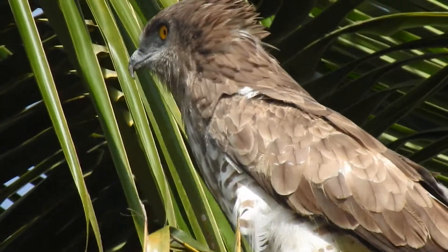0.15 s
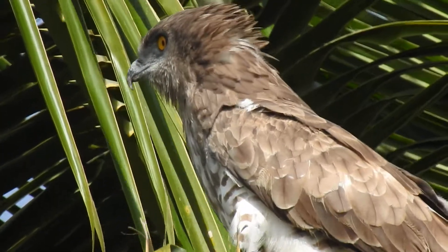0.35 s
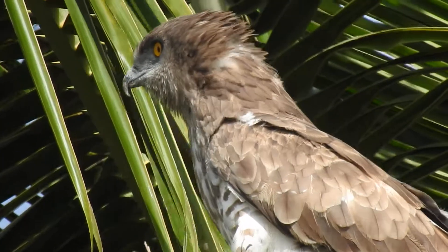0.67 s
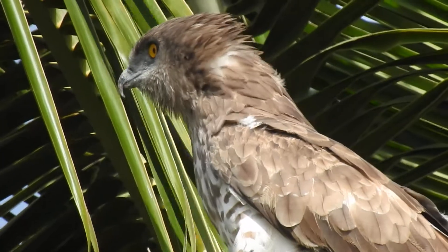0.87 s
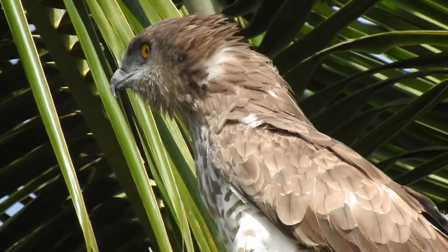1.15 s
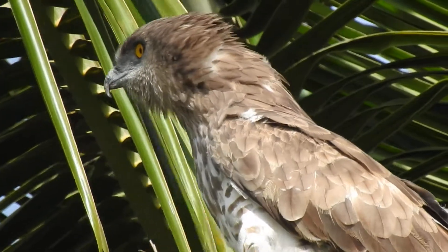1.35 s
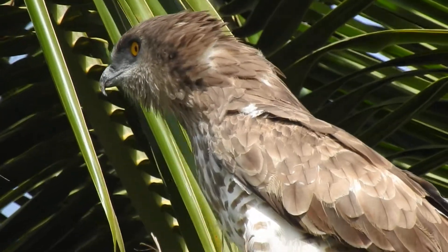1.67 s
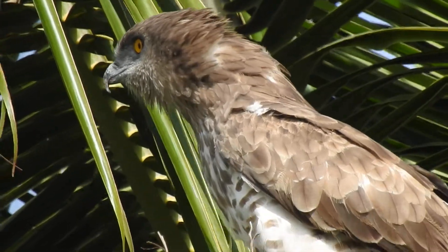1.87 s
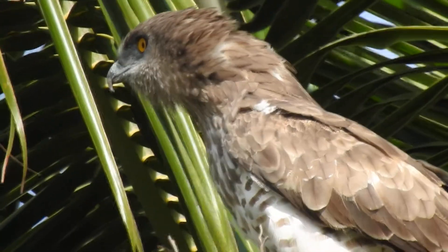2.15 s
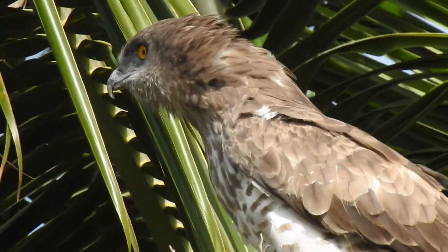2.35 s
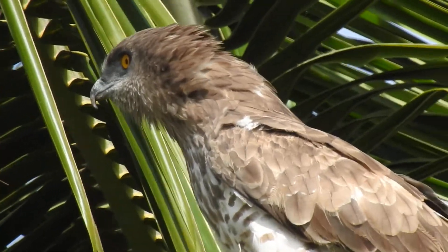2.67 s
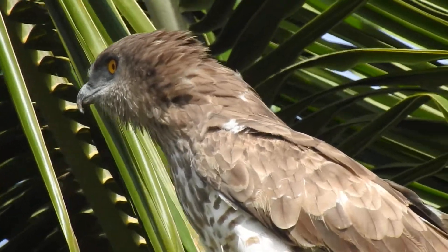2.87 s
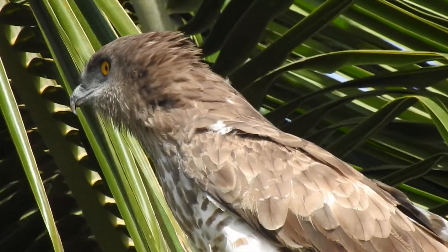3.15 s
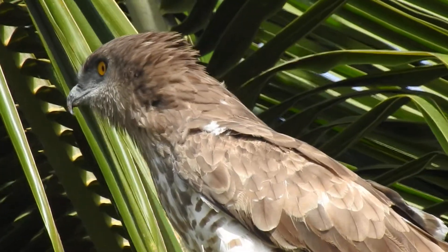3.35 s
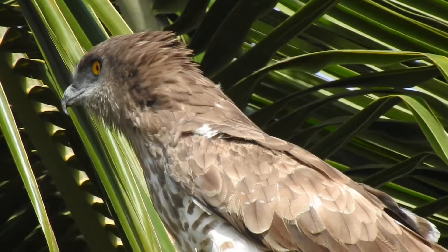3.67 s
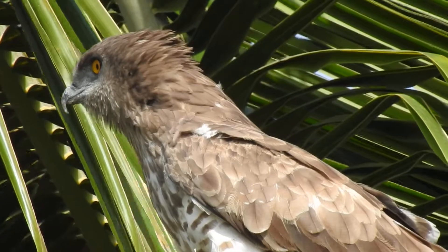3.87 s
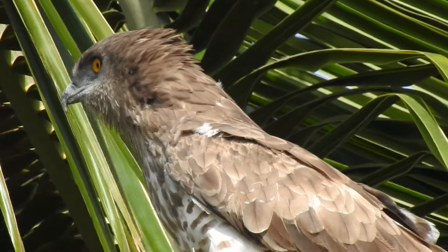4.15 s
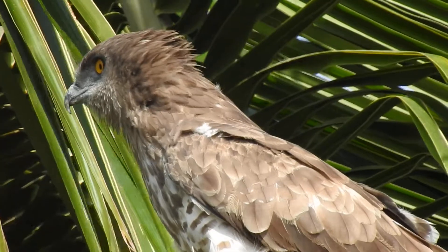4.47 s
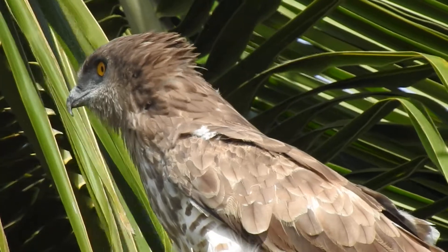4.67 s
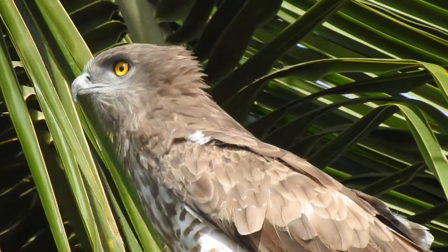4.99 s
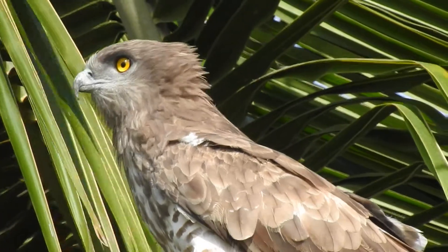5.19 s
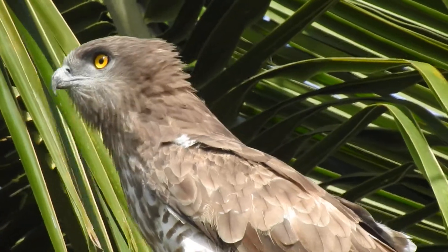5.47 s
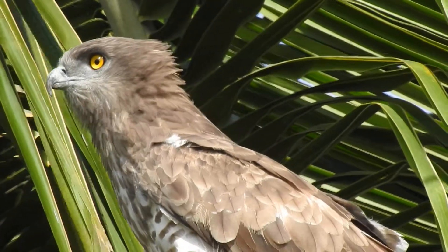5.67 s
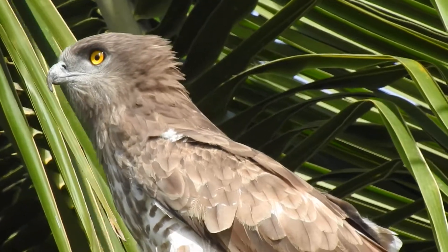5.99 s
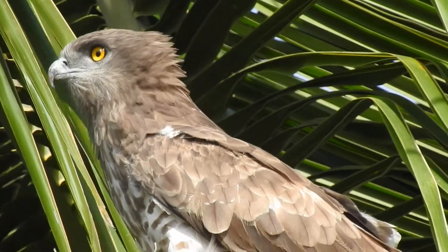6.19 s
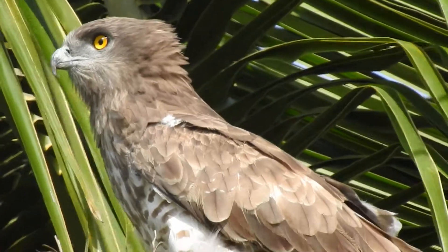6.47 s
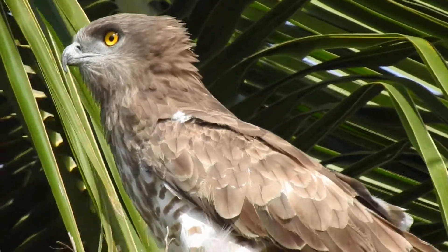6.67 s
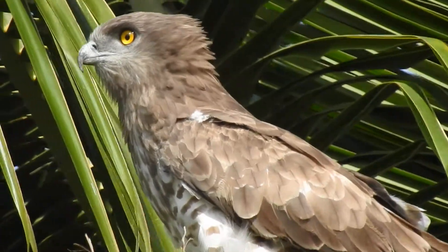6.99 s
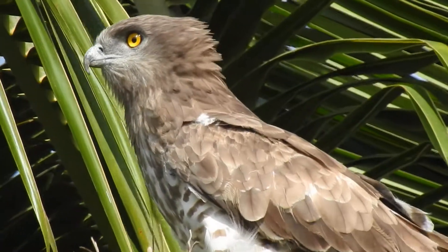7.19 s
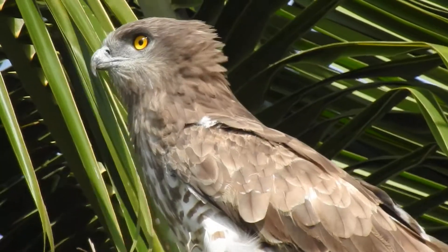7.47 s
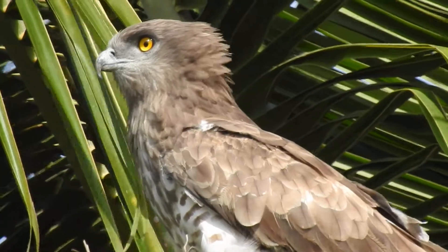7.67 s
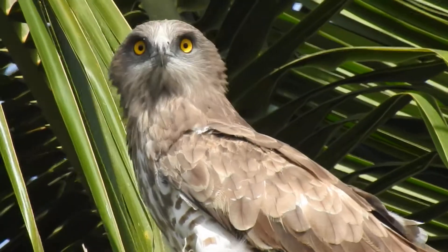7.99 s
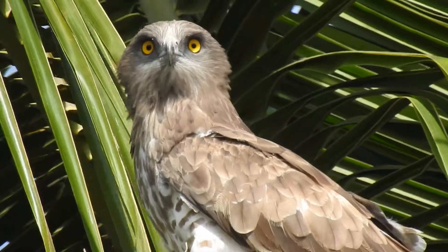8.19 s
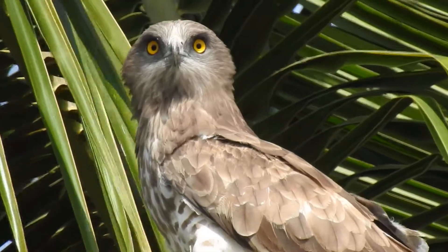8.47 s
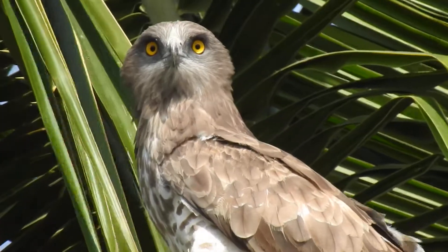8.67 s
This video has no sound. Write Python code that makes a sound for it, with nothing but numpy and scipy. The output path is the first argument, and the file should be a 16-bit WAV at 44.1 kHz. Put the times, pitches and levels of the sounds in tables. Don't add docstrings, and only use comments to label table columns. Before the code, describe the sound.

A flock of small birds scolds with harsh, arching squawks and dry rattles, hoarse answers farther off, over a faint engine thud and outdoor hush.

```python
import sys
import numpy as np
from scipy import signal
from scipy.fft import rfft, irfft, next_fast_len
from scipy.io import wavfile
from scipy.ndimage import uniform_filter1d

SR = 44100
rng = np.random.default_rng(int(sys.argv[2]) if len(sys.argv) > 2 else 0)


def field_ratio(decibels):
    return 10 ** (np.asarray(decibels, dtype=float) / 20)


def master_out(mix):
    frames = np.transpose(np.atleast_2d(mix))
    ceiling = np.clip(frames, -1, 1)
    pcm = np.round(ceiling * 32767).astype(np.int16)
    wavfile.write(sys.argv[1], SR, pcm)


N = 389403


def evened(x):
    return x / np.sqrt(np.mean(x ** 2) + 1e-20)


def read(points, hz):
    f, value = np.transpose(points)
    return np.interp(np.log(hz + 1), np.log(f + 1), value)


def played(rows):
    s, *columns = np.transpose(rows)
    t = np.arange(s[0], s[-1], 1 / SR)
    return t, *(np.interp(t, s, c) for c in columns)


def wander(n, size):
    return evened(uniform_filter1d(uniform_filter1d(rng.standard_normal(n), size), size))


# f/Hz, level/dB per Hz
HUSH_SPECTRUM = [(20, -55), (50, 1.5), (150, -5.5), (280, -21.5), (600, -21), (1400, -17.5), (2100, -11.5),
                 (4300, -17), (6400, -19.5), (8000, -28), (9500, -35), (13000, -39.5), (16000, -48)]
# t/s, level/dB
FLOCK_SWELL = [(0.0, -62.5), (0.42, -59), (0.83, -54), (1.3, -56.5), (2.02, -57), (2.31, -52.5),
               (3.75, -61.5), (3.84, -63), (3.92, -57), (5.75, -57), (5.85, -53), (6.37, -58.5),
               (6.789, -54), (7.7, -57), (7.8, -60), (8.43, -54), (8.548, -59.5), (8.83, -51.5)]
# f/Hz, likeness/1
PORT_LIKENESS = [(60, 1), (160, 0.3), (420, 0.63), (1120, 0.95), (2970, 0.58), (7870, 0.027)]


def hush():
    frames, hz = N // 256 + 5, np.fft.rfftfreq(1024, 1 / SR)
    a, b, c, d, patches = rng.standard_normal((frames, 513, 5)).T
    patches = evened(uniform_filter1d(uniform_filter1d(patches, 14, 0), 5, 1))
    swell_db = np.interp(np.arange(frames) * 256 / SR, *np.transpose(FLOCK_SWELL))
    bird_share = np.interp(hz, [250, 900, 6500, 8500], [0.3, 0.83, 1, 0.11])[:, None]
    same = np.clip(read(PORT_LIKENESS, hz), -1, 1)[:, None]
    left = a + 1j * b
    right = same * left + np.sqrt(1 - same ** 2) * (c + 1j * d)
    z = np.array([left * field_ratio(-2.0), right])
    chatter_db = bird_share * (4.5 * patches + swell_db - swell_db.mean())
    z *= field_ratio(read(HUSH_SPECTRUM, hz)[:, None] + chatter_db)
    return field_ratio(-41.5) * evened(signal.istft(z, nperseg=1024, noverlap=768)[1][:, :N])


# t/s, f/Hz, level/dB
MOTOR_LINE = [
    (0, 142.9, -49),
    (1.5, 143.9, -50),
    (3, 143.9, -54.5),
    (5, 144.2, -55),
    (8.83, 141.9, -82),
]


def whine():
    t, hz, db = played(MOTOR_LINE)
    level = field_ratio(db + 2.5 + 2.0 * wander(len(t), size=1500))
    turns = np.cumsum(hz + 1.5 * wander(len(t), size=3000)) / SR
    line = level * np.sin(2 * np.pi * turns)
    return np.pad(line, (0, N))[:N] * field_ratio([[-.7], [.7]])


# f/Hz, level/dB
EXHAUST_SPECTRUM = [(20, -38), (35, -40.5), (45, 2.5), (65, 2.5), (90, -2.5), (130, -10.5), (220, -16.5),
                    (300, -94), (600, -120)]


def pump():
    firing_hz, first_s, puff_s = 8.766, .1225, .045
    firings_s = first_s + np.arange(-1, N / SR * firing_hz - 1) / firing_hz
    at = np.round(firings_s * SR).astype(int)
    size = field_ratio(1.3 * rng.standard_normal((len(at), 2)))
    train = np.zeros(N + SR)
    train[at] = -size[:, 0]
    train[at + round(puff_s * SR)] = -.5 * size[:, 1]
    spectrum = field_ratio(read(EXHAUST_SPECTRUM, np.fft.rfftfreq(N + SR, 1 / SR)))
    thuds = irfft(rfft(train) * spectrum, N + SR)[:N]
    return field_ratio(-49) * evened(thuds) * field_ratio([[-.6], [.6]])


# f/Hz, t60/s
LEAF_T60 = [(1000, 0.053), (4000, 0.28), (9000, 0.11)]


def leaves(x):
    taps = np.zeros((2, SR // 2))
    at = np.arange(200, SR // 2 - 20, 20) + rng.integers(0, 20, (2, (SR // 2 - 201) // 20))
    np.put_along_axis(taps, at, rng.choice([-1., 1.], at.shape), 1)
    hz, t, z = signal.stft(taps, SR, nperseg=256)
    tail = signal.istft(z * field_ratio(-60 * t / read(LEAF_T60, hz)[:, None]), SR, nperseg=256)[1]
    tail += 5.7 * tail[::-1].mean(0)
    return signal.fftconvolve(x, tail / np.linalg.norm(tail[0]), axes=1)[:, :N]


def resonate(x, hz, width):
    turn = np.exp(2j * np.pi * np.cumsum(hz * np.ones(len(x))) / SR)
    r = np.exp(-np.pi * width / SR)
    return 2 * (turn * signal.lfilter([(1 - r) ** 2], [1, -2 * r, r * r], x / turn)).real


def through(x, body, mouth=1):
    return sum((-1) ** k * field_ratio(db) * resonate(x, hz * mouth, abs(width))
               for k, (hz, width, db) in enumerate(body))


def syrinx(hz, rough, flutter_db=0.89):
    shake = .07 * wander(len(hz), size=60) + .04 * wander(len(hz), size=400)
    turns = np.cumsum(hz * (1 + rough * shake)) / SR
    pulses = sum(np.cos(2 * np.pi * k * turns) * (k * hz < 14000) for k in range(1, 24))
    puffs = (0.23 + np.exp(-(turns % 1) / 0.36)) * rng.standard_normal(len(hz))
    flutter = field_ratio(flutter_db * (1.5 + 2 * rough) * wander(len(hz), size=130))
    return flutter * ((1 - rough) * evened(pulses) + rough * evened(puffs))


def swell(u, rise_db, top, fall_db, curve=1.34):
    top = np.clip(top, .05, .95)
    rise = np.clip(1 - u / top, 0, 1) ** curve
    fall = np.clip((u - top) / (1 - top), 0, 1) ** 2
    return -rise_db * rise - fall_db * fall


# t/s, left-right level/dB
LOUDEST_SIDE = [(0.0, -2.5), (0.44, -2.0), (0.59, -3.5), (0.86, -1.5), (2.43, -2.5), (2.75, 3), (3.27, 2.5),
                (3.39, -3), (4.72, -2), (4.92, -2), (5.21, -2), (6.54, -2.5), (7.18, 3.5), (7.55, 1),
                (7.72, 5.5), (8.19, -1.5), (8.58, -2.5), (8.83, -1)]


def add(mix, t, sound):
    pan_db = np.interp(t.mean(), *np.transpose(LOUDEST_SIDE))
    half_lag_samples = np.clip(.35 * pan_db, -2, 1)
    shift = np.exp(2j * np.pi * np.fft.rfftfreq(len(t)) * half_lag_samples)
    z = rfft(sound * signal.windows.tukey(len(t), .25))
    pair = irfft([z * shift * field_ratio(pan_db / 2), z / shift * field_ratio(-pan_db / 2)], len(t))
    part = mix[:, round(t[0] * SR):][:, :len(t)]
    part += pair[:, :part.shape[1]]


# t/s, level/dB
CROAK_EFFORT = [
    (7.53, -58),
    (7.6, -51),
    (7.7, -53),
    (7.75, -58),
]
# f/Hz, width/Hz, level/dB
CROAKER_THROAT = [(1000, 200, 0), (1400, 200, -3), (1850, 200, -1)]


def croak():
    out = np.zeros((2, N))
    t, effort_db = played(CROAK_EFFORT)
    pulse_hz = 77 + 3 * wander(len(t), size=600)
    pulses = np.diff(np.floor(np.cumsum(pulse_hz) / SR), prepend=0)
    pulses = pulses * (1 + 0.12 * rng.standard_normal(len(t)))
    add(out, t, field_ratio(effort_db) * evened(through(pulses, CROAKER_THROAT)))
    return out


# t/s, length/s, level/dB
FAR_CALLS = [(.085, 0.35, -41), (.36, 0.094, -43), (.52, 0.053, -45), (2.24, .24, -42), (2.62, 0.097, -41),
             (2.76, 0.12, -39), (3.16, 0.17, -40), (3.61, 0.2, -38), (4.07, 0.2, -37), (4.38, .12, -46.5),
             (4.53, 0.19, -35.5), (5.06, .23, -37.5), (5.32, 0.092, -36.5), (5.51, 0.22, -37),
             (5.74, 0.1, -38.5), (8.13, 0.32, -40), (8.55, 0.34, -42.5)]
# f/Hz, width/Hz, level/dB
FAR_CALLER_THROAT = [(2085, 186, 4), (3484, 750, -3.5), (6340, 1240, -6), (655, 63, -10)]
# rise/dB, top/share of call, fall/dB
FAR_CALL_SWELL = (5.4, 0.94, 11)
# t/s, length/s, level/dB
DEEP_CALLS = [(2.94, .11, -46.5), (3.38, .14, -46), (3.57, .13, -48), (3.86, .12, -43.5),
              (4.07, .15, -45.5), (4.31, 0.17, -44), (4.53, .17, -45.5)]
# f/Hz, width/Hz, level/dB
DEEP_CALLER_THROAT = [(1634, 250, 2), (2007, 130, 2), (3100, 950, -5), (1010, 57, -9)]
# rise/dB, top/share of call, fall/dB
DEEP_CALL_SWELL = (8, .45, 3.8)


def far_birds():
    out = np.zeros((2, N))
    for calls, throat, hz, shape in ((FAR_CALLS, FAR_CALLER_THROAT, 690, FAR_CALL_SWELL),
                                     (DEEP_CALLS, DEEP_CALLER_THROAT, 410, DEEP_CALL_SWELL)):
        for s, length_s, effort_db in calls:
            t = np.arange(0, length_s, 1 / SR)
            mouth = np.linspace(.97, 1.02, len(t))
            voice = evened(through(syrinx(hz * mouth, rough=.65), throat, mouth))
            add(out, s + t, field_ratio(effort_db + swell(t / length_s, *shape)) * voice)
    return out


# t/s, level/dB
CHIRP_TIMES = [(.045, -47), (1.991, -45), (3.493, -48), (3.872, -46.5), (5.079, -47), (5.46, -47.5),
               (8.593, -46.5)]
# t/s, f/Hz, level/dB
CHIRP_SHAPE = [
    (0, 4500, 8),
    (.015, 4580, 7.5),
    (.04, 4100, 7.5),
    (.045, 4550, -27),
    (.08, 4540, 6),
    (.11, 4540, -17),
]


def chirps():
    out = np.zeros((2, N))
    t, hz, db = played(CHIRP_SHAPE)
    turn = 2 * np.pi * np.cumsum(hz) / SR
    for s, level_db in CHIRP_TIMES:
        add(out, t + s, field_ratio(level_db + db) * (np.sin(turn) + field_ratio(-9) * np.sin(2 * turn)))
    return out


# t/s, length/s, level/dB, sag/dB through the rattle
RATTLE_CALLS = [(0.137, 0.2, -42, -5.5), (0.533, 0.3, -37.5, 2.5), (2.563, 0.24, -36.5, 1),
                (3.019, 0.16, -38.5, -2.5), (4.206, 0.25, -42, -5.5), (4.59, .23, -36, 7),
                (6.947, .265, -37, 4.5), (7.303, 0.23, -38.5, 0.2), (7.682, .24, -35, 3.5)]
# f/Hz, width/Hz, level/dB
RATTLER_BODY = [(2900, 4200, -18.5), (4550, 1200, 0.5), (6300, 1090, 6.5), (7050, 2100, -10.5)]


def rattles():
    out = np.zeros((2, N))
    pitch_hz, beats_per_s = 1530, 54
    for s, length_s, effort_db, sag_db in RATTLE_CALLS:
        t = np.arange(0, length_s, 1 / SR)
        turn = (t * beats_per_s) % 1
        beats = np.clip(turn / .15, 0, 1) * np.exp(-(turn / .5) ** 3) + .15
        drive = beats * syrinx(pitch_hz + 0 * t, .55, flutter_db=0.03)
        rasp = evened(through(drive, RATTLER_BODY))
        add(out, s + t, field_ratio(effort_db + 5.5 - sag_db * t / length_s) * rasp)
    return out


# f/Hz, width/Hz, level/dB
NEAR_THROAT = [(3700, 673, 0.5), (6500, 7600, -30.5)]
# f/Hz, width/Hz, level/dB
NEAR_CHEST = [(2146, 154, 2), (2703, 530, -7)]
# f/Hz, width/Hz
BEAK_RING = (6723, 850)
# f/Hz, width/Hz, level/dB
BEAK_EDGE = (11000, 1800, -16.5)


def squawk(t, effort_db, hz, mouth, bright_db, rough, chest_db):
    drive = syrinx(hz, rough)
    throat_hz, throat_width_hz = NEAR_THROAT[0][:2]
    scale = 1 / np.std(resonate(drive, throat_hz * mouth, throat_width_hz))
    body = through(drive, NEAR_THROAT, mouth) + field_ratio(chest_db) * through(drive, NEAR_CHEST)
    beak = evened(resonate(drive, BEAK_RING[0] * (mouth / mouth.max()) ** 0.16, BEAK_RING[1]))
    beak = beak + field_ratio(BEAK_EDGE[2]) * evened(resonate(drive, *BEAK_EDGE[:2]))
    return field_ratio(effort_db) * (scale * body + field_ratio(bright_db) * beak)


def near_call(out, s, climb_s, effort_db, start_hz, top_hz, throat_hz, bright_db, rough, voice):
    rise_db, curve, release_s, fall_db, chest_db = voice
    t = np.arange(0, climb_s + release_s, 1 / SR)
    climb = np.sin(np.pi / 2 * np.clip(t / climb_s, 0, 1)) ** 1.3
    fall = np.clip((t - climb_s) / release_s, 0, 1) ** 3
    hz = (start_hz + (top_hz - start_hz) * climb) * (1 - .14 * fall)
    strain = rough + (1 - rough) * np.maximum(.28 * (1 - climb), .7 * fall)
    mouth = throat_hz / NEAR_THROAT[0][0] * (.87 + .13 * climb - .06 * fall)
    effort_db = effort_db + swell(t / t[-1], rise_db, climb_s / t[-1], fall_db, curve)
    chest_db = chest_db + 7 * np.log2(top_hz / 850)
    bright_db = bright_db + 3 * (t / climb_s - 1)
    add(out, s + t, squawk(t, effort_db, hz, mouth, bright_db, strain, chest_db))


def tuned(top_hz, aim_hz, share):
    rest_hz = 4370
    return rest_hz + share * (round(aim_hz / top_hz) * top_hz - rest_hz)


# t/s, climb/s, level/dB, start f/Hz, top f/Hz
CLEAR_CALLS = [(.97, .1, -27, 760, 937.4), (1.309, .09, -27, 597, 909.5), (4.81, .13, -30, 637, 778),
               (5.82, .1, -30.5, 727, 774.5), (5.955, .08, -33, 843, 1008), (6.85, .062, -30.5, 843, 971)]
# t/s, climb/s, level/dB, top f/Hz, brightness/dB
HARSH_CALLS = [(.67, .21, -27.5, 726.3, -1.5), (.91, 0.1, -27.5, 995, -0.5), (1.11, 0.1, -34, 725, -3.5),
               (1.519, 0.14, -31.5, 854, 2), (1.76, 0.15, -26, 978, -3), (2.02, .105, -26.5, 931, -3.5),
               (2.21, .14, -27, 885, -4.5), (2.42, .105, -28.5, 941, -2.5), (3.32, .06, -68, 763, -9),
               (3.96, 0.087, -62, 784, -14), (6.4, 0.15, -32.5, 800, -1), (6.79, 0.082, -29.5, 850, -3.5),
               (7.19, .1, -28, 916, -4.5), (7.36, 0.11, -26.5, 897, -6), (7.89, .15, -31, 861, -5),
               (8.35, .14, -27.5, 912, -6)]
# t/s, climb/s, level/dB, throat f/Hz, brightness/dB
HUSKY_CALLS = [(.14, .16, -31.5, 4010, -8), (.36, .09, -37.5, 4210, 1.5), (1.24, .08, -31, 4200, -1),
               (4.38, .13, -30, 4450, -.5), (5.72, .14, -29, 4340, .1), (6.11, .125, -36, 4270, 4),
               (6.26, .055, -44, 4340, -3), (6.63, .098, -24.5, 4470, 3), (8.13, .1, -33, 4400, -4),
               (8.25, .078, -29.5, 4380, -4.5), (8.64, .13, -45.5, 4150, -7)]
# rise/dB, rise curve/1, release/s, fall/dB, chest level/dB
CLEAR_SHAPE = (12, 2.5, .045, 5, -7.5)
HARSH_SHAPE = (16.5, 2, 0.0288, 6, -10)
HUSKY_SHAPE = (17, 2.06, 0.045, 46, -10)


def near_birds():
    out = np.zeros((2, N))
    even_db, start_share = -30, .77
    for s, climb_s, db, start_hz, top_hz in CLEAR_CALLS:
        rough = max(.07 + .032 * (db - even_db), .03)
        bright_db = 2.5 * (even_db - db)
        throat_hz = tuned(top_hz, aim_hz=4220, share=.6)
        near_call(out, s, climb_s, db, start_hz, top_hz, throat_hz, bright_db, rough, CLEAR_SHAPE)
    for s, climb_s, db, top_hz, bright_db in HARSH_CALLS:
        throat_hz = tuned(top_hz, aim_hz=4500, share=.3)
        near_call(out, s, climb_s, db, start_share * top_hz, top_hz, throat_hz, bright_db, .33, HARSH_SHAPE)
    for s, climb_s, db, throat_hz, bright_db in HUSKY_CALLS:
        top_hz = throat_hz / 5.25
        near_call(out, s, climb_s, db, start_share * top_hz, top_hz, throat_hz, bright_db, .48, HUSKY_SHAPE)
    return out


# f/Hz, level/dB
BIRD_TONE_SPECTRUM = [(500, -3.5), (1000, 3.5), (1800, 2.5), (7400, 0.5), (8300, -3.5), (9500, -30),
                      (11000, -3.5), (13000, -52)]


def scene():
    near = near_birds() + rattles() + chirps()
    far = far_birds() + croak()
    birds = near + far + leaves(field_ratio(-8) * near + field_ratio(-3) * far)
    size = next_fast_len(N)
    tone = field_ratio(read(BIRD_TONE_SPECTRUM, np.fft.rfftfreq(size, 1 / SR)))
    birds = irfft(rfft(birds, size) * tone, size)[:, :N]
    return birds + pump() + whine() + hush()


def roll_off(x):
    return signal.sosfilt(signal.butter(12, 15740, fs=SR, output="sos"), x)


def record(dry):
    return roll_off(dry)


dry = scene()
out = record(dry)
master_out(out)
```